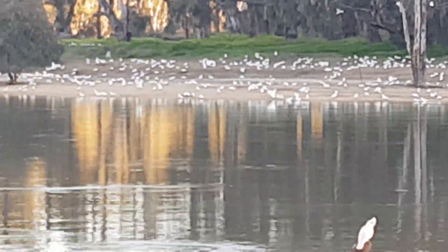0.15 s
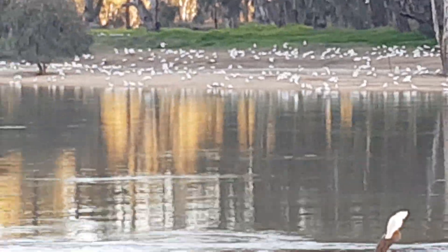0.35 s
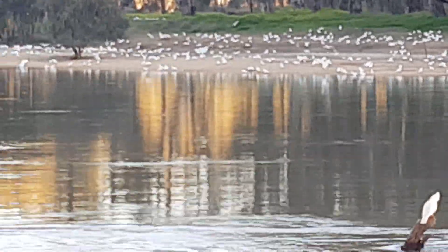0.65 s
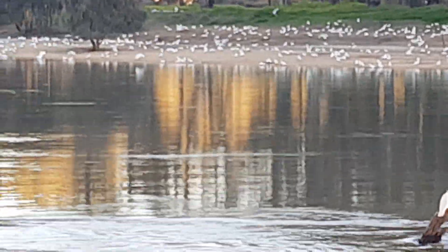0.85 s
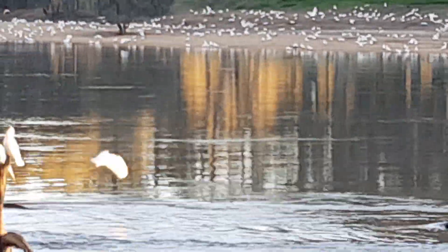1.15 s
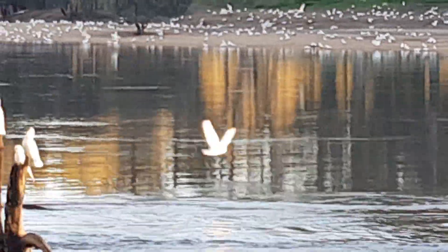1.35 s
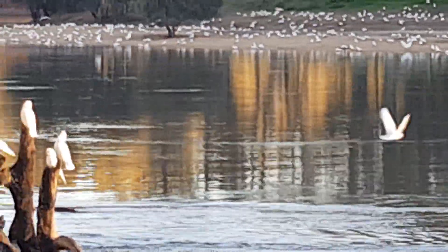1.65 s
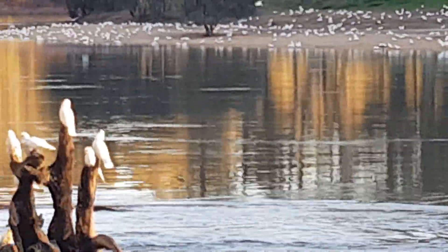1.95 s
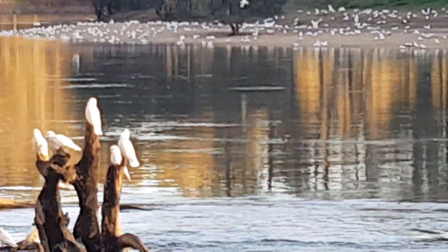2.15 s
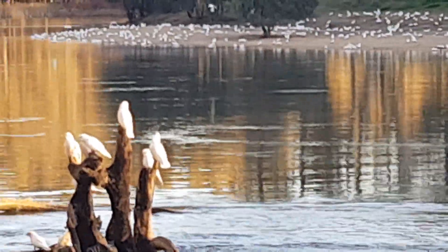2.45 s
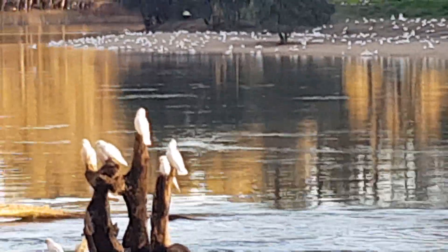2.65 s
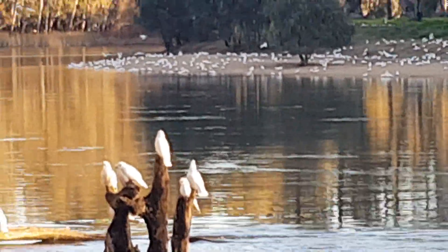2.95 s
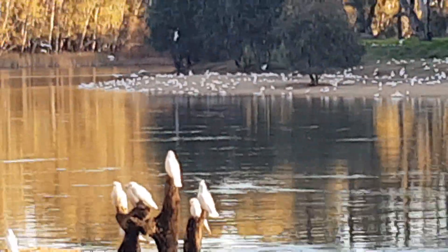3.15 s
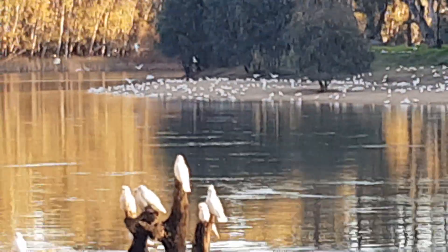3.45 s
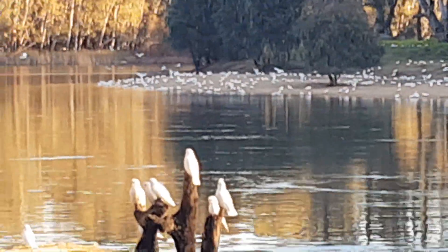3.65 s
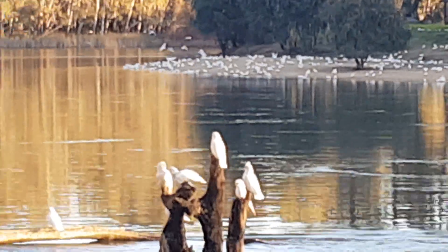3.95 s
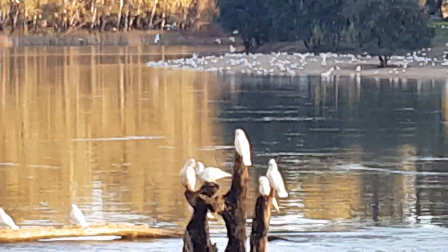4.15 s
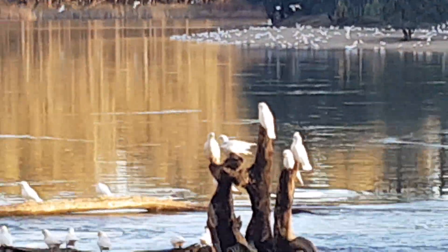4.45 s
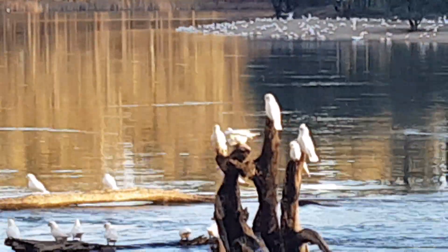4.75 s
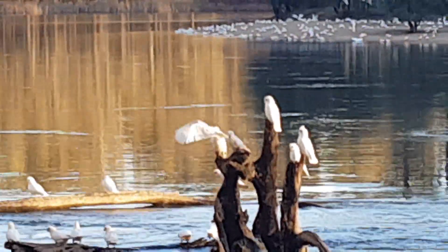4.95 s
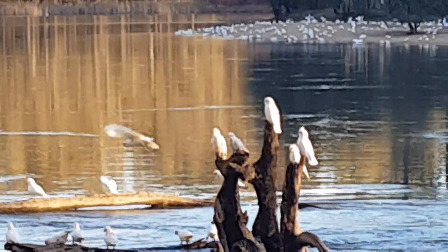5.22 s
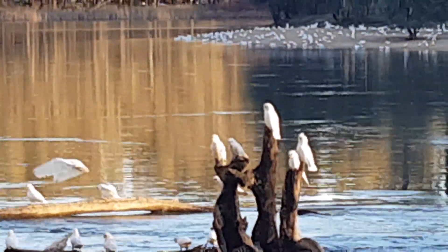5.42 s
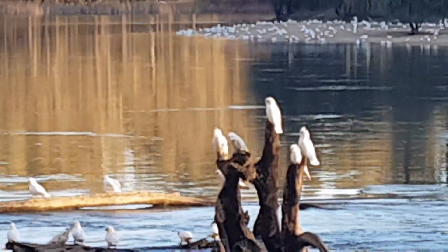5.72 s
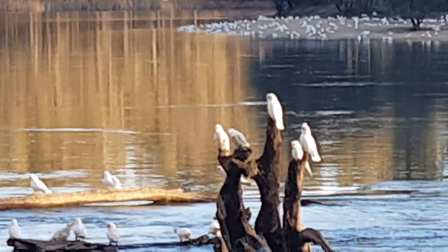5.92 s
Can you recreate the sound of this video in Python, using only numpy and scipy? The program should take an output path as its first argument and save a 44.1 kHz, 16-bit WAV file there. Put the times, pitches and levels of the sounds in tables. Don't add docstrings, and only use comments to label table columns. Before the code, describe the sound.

White parrots screech harshly and squeal close by at a riverside, over the constant clamour of a big flock across the water and a low rumble.

```python
import sys
import numpy as np
from scipy import signal
from scipy.fft import rfft, irfft, next_fast_len
from scipy.io import wavfile
from scipy.ndimage import uniform_filter1d

SR = 44100
rng = np.random.default_rng(int(sys.argv[2]) if len(sys.argv) > 2 else 0)


def dump_mix(stems):
    frames = np.atleast_2d(stems).T
    limited = np.clip(frames, -1, 1)
    pcm = np.round(limited * 32767).astype(np.int16)
    wavfile.write(sys.argv[1], SR, pcm)


def ratio(d):
    e = np.asarray(d, float) / 20
    return 10 ** e


N = 268128

TREBLE_HZ = 4500

# (start [s], length [s], effort [dB], swell [s], treble over body [dB])
SCREECHES = [(0, 0.12, -34, 0.13, -12), (.095, 0.38, -25, 0.14, -10), (.425, 0.21, -25.5, 0.0597, -10.5),
             (0.76, .42, -45.5, 0.066, -17.5), (1.171, 0.31, -35.5, 0.08, -10),
             (1.66, 0.5, -33, 0.0797, -8.5), (2.66, 0.7, -28, 0.3, -15), (3.549, 0.31, -37, 0.28, -11.5),
             (3.84, .84, -30.5, 0.09, -10), (4.875, 0.505, -27, 0.12, -13.5),
             (5.369, 0.4, -34, 0.12, -20.5), (5.816, 0.28, -40, 0.039, -12.5)]
# (pitch [Hz], low resonance [Hz], its level [dB], high resonance [Hz],
# its level [dB], beak resonance [Hz], its level [dB])
SCREECHERS = [(1136, 2300, 3, 3100, 3, 10200, 5), (1255, 2620, 14, 3500, 9, 11370, 6.5),
              (1229, 2610, 12, 3480, 12, 10900, 6), (1090, 2130, 12, 3200, 0, 9900, -8),
              (1145, 2300, 5, 3320, 10, 10100, 7), (1104, 2400, 5, 3320, 10, 9970, 2.5),
              (1135, 2340, 8, 3210, 8, 9500, 3), (1204, 2750, 5, 3240, 7, 10100, 4),
              (1179, 2630, 6, 3340, 7, 9840, 5), (1199.5, 2480, 9, 3300, 10, 10500, 5),
              (1124, 2490, 10, 3220, 9, 10000, 4), (1140, 2560, 9, 3240, 8, 9600, 5)]
SCREECH_LEADS = [.2, .18, .18, -.18, .24, .26, .215, .34, .23, .35, .23, .23]
SCREECH_RELEASES = [.04, .06, .05, .04, .04, .04, .16, .04, .05, .04, .04, .04]
NASAL_LEVELS = [0, 6.5, 6.5, -4, 2, 2.5, -1, 0, 3, 2, 0, 0]
WINDPIPE_WIDTHS = [900, 600, 600, 900, 700, 750, 1050, 900, 900, 1000, 800, 900]
# (start [s], length [s], effort [dB], swell [s])
SQUEALS = [(.615, .06, -38, .02), (.722, .04, -40.5, .013), (1.27, .14, -43, .03),
           (1.585, .105, -33.5, .015), (1.68, .045, -32, .012), (1.755, .13, -32, .09),
           (2.212, .068, -35, .012), (2.258, .08, -31.5, .008), (2.338, .078, -31.5, .012),
           (2.49, .125, -39, .09), (2.655, .05, -38, .02), (3.35, .045, -45, .02), (3.7, .11, -43, .05),
           (3.785, .11, -41, .055), (4.04, .52, -29.5, .17), (4.645, .082, -27.5, .04),
           (4.728, .05, -30, .01), (4.762, .065, -27.5, .015), (4.672, .055, -31, .03),
           (4.74, .05, -33, .015), (4.845, .07, -31.5, .012), (5.33, .295, -33.5, .03),
           (5.65, .09, -33, .05), (5.73, .095, -29, .02), (5.81, .055, -31, .01), (5.88, .04, -36, .01),
           (6.03, .065, -30.5, .015), (4.625, .035, -33, .012), (4.812, .042, -33, .008)]
SQUEAL_LEADS = [-.35, -.39, .24, .25, .27, -.36, -.42, -.275, -.28, -.41, -.43, -.34, -.5, .23, .27, -.28,
                -.28, -.27, .36, .37, -.32, .23, -.42, -.39, -.375, -.3, -.32, .36, -.27]
# (first pitch [Hz], pitch at the bend [Hz], last pitch [Hz], place of the bend
ARCHES = [(1230, 1300, 1490, .35), (915, 935, 925, .5), (753, 776, 794, .45), (950, 1060, 1005, .4),
          (1010, 1005, 990, .5), (1082, 1095, 1050, .7), (820, 842, 788, .3), (785, 812, 700, .6),
          (812, 790, 620, .6), (670, 800, 890, .55), (870, 900, 880, .4), (830, 930, 800, .45),
          (776, 775, 750, .4), (970, 1092, 1050, .65), (624, 664, 615, .27), (800, 812, 840, .6),
          (812, 788, 822, .4), (815, 832, 820, .45), (900, 1110, 980, .7), (940, 1025, 850, .4),
          (915, 1130, 1165, .75), (590, 690, 578, .25), (705, 790, 838, .55), (830, 935, 750, .36),
          (755, 697, 702, .4), (740, 735, 725, .5), (665, 684, 570, .22), (980, 1085, 950, .5),
          (825, 795, 715, .4)]
# (first [Hz], level [dB], second [Hz], level [dB])
WINDPIPES = [(2780, 28, 5560, 8), (2800, 24, 1870, 3), (775, 12, 3100, 8), (2030, 24, 3900, 24),
             (2010, 16, 4020, 27), (2160, 19, 3280, 16), (2400, 26, 3300, 6), (2350, 29, 3350, 11),
             (2350, 30, 3350, 10), (2500, 22, 2050, 8), (2680, 22, 3500, 6), (3440, 16, 2200, 14),
             (770, 14, 4600, 14), (3250, 12, 2150, 5), (1290, 13, 2900, 24), (3280, 18, 2450, 25),
             (3200, 21, 2430, 21), (3280, 17, 2460, 25), (2100, 22, 3300, 4), (1950, 22, 3700, 14),
             (3150, 22, 2200, 10), (1290, 15, 2900, 17), (2450, 20, 3200, 8), (2600, 28, 2300, 8),
             (2840, 22, 3500, 12), (2200, 20, 3600, 8), (3200, 24, 2550, 12), (2100, 22, 3300, 6),
             (1550, 20, 4000, 12)]
BEAK_CENTRES = [5050, 5050, 5050, 5500, 6000, 5050, 5050, 5100, 5000, 5050, 5050, 5050, 5050, 5050, 5050,
                5000, 5600, 5200, 5400, 5050, 4800, 5050, 4600, 5500, 5050, 5050, 5050, 5400, 5000]
BEAK_LEVELS = [8, 4, 4, 13, 14, 0, 16, 29, 29, 20, 16, 4, 8, 4, 4, 18, 26, 28, 26, 6, 26, 5, 28, 33, 24, 4,
               12, 16, 14]
SQUEAL_TREBLES = [-11, -5, 4, -6, -6, -23, -10, -8, -12, -24, -11, -12, -5, 14, -8, 1, 1, 2, 0, 5, 0, -1, 7,
                  10, 0, -6, -4, -6, -6]
SQUEAL_ROUGHNESS = [.1, .12, .5, .12, .1, .2, .2, .2, .2, .15, .2, .2, .4, .08, .45, .3, .25, .35, .15, .2,
                    .15, .6, .15, .08, .15, .3, .15, .2, .2]


def near_birds():
    harsh, clear = np.zeros((2, 2, N))
    screeches = zip(SCREECHES, SCREECH_LEADS, SCREECH_RELEASES, NASAL_LEVELS, WINDPIPE_WIDTHS, SCREECHERS)
    for row, lead_ms, release_s, nasal_db, width_hz, bird in screeches:
        voice = screech(row, release_s, nasal_db, width_hz, *bird)
        add(harsh, row[0], near_call(voice, lead_ms), lead_ms)
    squeals = zip(SQUEALS, SQUEAL_LEADS, ARCHES, WINDPIPES, BEAK_CENTRES, BEAK_LEVELS,
                  SQUEAL_TREBLES, SQUEAL_ROUGHNESS)
    for row, lead_ms, *voice in squeals:
        add(clear, row[0], near_call(squeal(row, *voice), lead_ms), lead_ms)
    return harsh, clear


# (frequency [Hz], level per Hz [dB])
THROAT = [(300, -57), (550, -19), (700, -6.5), (1200, -7), (1800, -2.5), (2500, -5), (3650, -4),
          (4200, -10), (6000, -14), (7500, -25), (8700, -19), (11100, -26), (15500, -32.5)]


def screech(row, release_s, nasal_db, width_hz, pitch_hz, first_ring_hz, first_ring_db, second_ring_hz, second_ring_db, beak_hz, beak_db):
    _, length, top_db, swell_s, treble_db = row
    course_db = effort(length, swell_s, 8.5, 6.5, release_s)
    n = len(course_db)

    def moving():
        return 1 + .005 * (course_db + 2) + .02 * wander(n, .03)

    stumble = .05 * wander(n, .002)
    pulses = syrinx(pitch_hz * (moving() + stumble), .85)
    plain = shaped(pulses, lambda f: ratio(read(THROAT, f)))
    rings = [(first_ring_hz, first_ring_db, width_hz), (second_ring_hz, second_ring_db, width_hz),
             (beak_hz, beak_db, 1800), (0.78 * beak_hz, nasal_db, 900)]
    voice = plain + sum((ratio(db) - 1) * resonate(plain, hz * moving(), width) for hz, db, width in rings)
    treble = shaped(voice, lambda f: f > TREBLE_HZ)
    body = evened(voice - treble)
    strain_db = 0.12 * course_db
    waver_db = 0.67 * wander(n, 0.039) + 1.2 * wander(n, 0.002)
    return ratio(top_db + course_db + waver_db) * (body + ratio(treble_db + strain_db) * evened(treble))


def squeal(row, arch, windpipe, beak_hz, beak_db, treble_db, rough):
    _, length, top_db, swell_s = row
    first_hz, top_hz, last_hz, place = arch
    first_ring_hz, first_ring_db, second_ring_hz, second_ring_db = windpipe
    course_db = effort(length, swell_s, 12, 21, .012)
    n = len(course_db)
    arch_hz = np.interp(np.linspace(0, 1, n), [0, place, 1], [first_hz, top_hz, last_hz])
    hz = arch_hz * (1 + .006 * wander(n, .008))
    turns = np.cumsum(hz * (1 + 0.0283 * rough * wander(n, 0.002))) / SR
    order = np.arange(1, 19)[:, None]

    def bump(centre_hz, width_hz=430):
        return 1 / (1 + ((order * hz - centre_hz) / width_hz) ** 2)

    rings_db = first_ring_db * bump(first_ring_hz) + second_ring_db * bump(second_ring_hz) + beak_db * bump(beak_hz, 1100)
    over_throat_db = np.where(order < 9, -16 + rings_db, treble_db)
    levels = ratio(read(THROAT, order * hz) + over_throat_db)
    tone = np.zeros(n)
    for k, level in enumerate(levels, 1):
        flutter = ratio(1.46 * wander(n, 0.011) + 6 * rough * wander(n, 0.0017))
        tone += level * flutter * np.cos(2 * np.pi * k * turns)
    tone = np.sqrt(2) * tone / np.linalg.norm(levels, axis=0)
    rasp = evened(shaped(syrinx(hz, 0.94), lambda f: ratio(read(THROAT, f))))
    return ratio(top_db + course_db) * (tone + ratio(-11) * rasp)


def syrinx(hz, rough, jitter=.12, shimmer_db=3.5, breath=0.64, count=13):
    n = len(hz)
    stumble = jitter * rough * wander(n, .0006) + .02 * wander(n, 0.01504)
    turns = np.cumsum(hz * (1 + stumble)) / SR
    order = np.arange(1, count + 1)[:, None]
    partials = np.cos(2 * np.pi * order * turns) * (order * hz < 15800)
    pulses = partials.sum(0)
    puffs = (0.99 + np.exp(-(turns % 1) / 0.44)) * rng.standard_normal(n)
    strength = ratio(shimmer_db * rough * wander(n, 0.00064))
    share = np.clip(breath * rough, 0, 1)
    return (np.sqrt(1 - share ** 2) * evened(pulses) + share * evened(puffs)) * strength


def effort(length, swell_s, swell_db, sag_db_per_s, release_s, release_db=21):
    t = np.arange(0, length, 1 / SR)
    swell = -swell_db * np.clip(1 - t / swell_s, 0, 1)
    sag = -sag_db_per_s * np.maximum(t - swell_s, 0)
    release = -release_db * np.clip(1 - (length - t) / release_s, 0, 1)
    return swell + sag + release


def resonate(x, hz, width_hz):
    turn = np.exp(2j * np.pi * np.cumsum(hz) / SR)
    r = np.exp(-np.pi * width_hz / SR)
    return 2 * (turn * signal.lfilter([(1 - r) ** 2], [1, -2 * r, r * r], x / turn)).real


def near_call(voice, lead_ms, shadow_db=8.0):
    voice = voice * signal.windows.tukey(len(voice), min(0.0054 * SR / len(voice), 1))
    lost = 1 - ratio(-shadow_db * (lead_ms < 0))
    dull = voice - lost * shaped(voice, lambda f: f > TREBLE_HZ)
    return np.array([dull, voice])


def scatter(x, t60, count):
    at = np.arange(count) * 20 + 60 + rng.integers(0, 20, (2, count))
    taps = np.zeros((2, count * 20 + 100))
    echoes = rng.choice([-1., 1.], at.shape) * ratio(-60 * at / SR / t60)
    np.put_along_axis(taps, at, echoes, 1)
    return signal.fftconvolve(x, taps / np.linalg.norm(taps[0]), axes=1)[:, :N]


def shifting(x, t60, count):
    turn = 2 * np.pi * 3.5 * np.arange(N) / SR
    return sum(scatter(x * np.sqrt(2 / 3) * np.cos(turn + k * np.pi / 3), t60, count) for k in range(3))


# (time [s], level [dB])
CLAMOUR = [(0.0, -43.5), (0.25, -49), (0.66, -50), (1.2, -49), (1.42, -48), (2.32, -50), (2.5, -52),
           (2.8, -43.5), (3.23, -45), (3.45, -51.5), (3.6, -48), (4.69, -43.5), (5.6, -46.5), (5.72, -43),
           (6.08, -43)]
# (frequency [Hz], level per Hz [dB])
FAR_COLOUR = [(260, -40), (450, -16), (605, -7.5), (1090, -13.5), (1330, -8), (1450, -5.5), (1680, -12),
              (2070, -6), (2330, -4), (2820, -8), (3000, -10), (3630, -12.5), (4530, -19), (8080, -39.5),
              (15500, -37)]


def far_bank(count=110):
    mix = np.zeros((2, N + SR))
    lead_in_s = .4
    for k, (at, long, pitch, arch, rough, loud, side) in enumerate(rng.random((count, 7))):
        u = np.linspace(0, 1, round((.15 + .4 * long) * SR))
        hz = (600 + 600 * pitch) * (1 + .15 * arch * np.sin(np.pi * u))
        call = ratio(7.0 * loud) * syrinx(hz, 0.2985 + 0.592 * rough, count=8)
        call = call * signal.windows.tukey(len(u), .3)
        start_s = (k + at) / count * (N / SR + lead_in_s)
        add(mix, start_s, np.array([call, call]), .7 * side - .5)
    mix = mix[:, round(lead_in_s * SR):][:, :N]
    mix = mix + shifting(mix, 0.88, count=1200)
    mix = evened(shaped(mix, lambda f: ratio(read(FAR_COLOUR, f))))
    s, level_db = np.transpose(CLAMOUR)
    return ratio(np.interp(np.arange(N) / SR, s, level_db) + 10.0) * mix


# (time [s], peak level [dB])
PLOP = [
    (6.01, -34),
]


def plop():
    mix, t = np.zeros((2, N)), np.arange(900) / SR
    for s, peak_db in PLOP:
        ring = ratio(peak_db - 60 * t / 0.03) * np.sin(2 * np.pi * 340 * t)
        add(mix, s - .004, np.array([ring, ring]), 0)
    return mix


# (time [s], pitch [Hz], level [dB])
HUM = [(0, 187, -51), (.25, 186, -44.5), (.65, 185, -51), (.85, 184.5, -45), (1.3, 183.5, -48),
       (1.7, 182.5, -53), (2.2, 181, -58), (3, 178, -56), (3.7, 177, -63), (4.3, 176, -60), (5, 175, -68),
       (6.08, 174, -70)]
# (time [s], pitch [Hz], level [dB])
THROB = [(0.0, 68, -50), (0.3, 70.1, -66.5), (0.76, 70, -51), (1.64, 68.2, -65), (1.69, 69.9, -56),
         (2.13, 68.6, -62.5), (2.81, 65, -64), (3.3, 67.8, -59), (3.49, 64.7, -58), (3.84, 65.4, -53),
         (4.21, 63.6, -65), (4.37, 68.2, -50.5), (5.88, 67.6, -53), (6.08, 65.3, -54)]


def motors():
    upper = np.array(HUM) * [1, 1.22, 1]
    return motor_order(HUM, .8, .03) + ratio(-13) * motor_order(upper, 2.5, .05) + motor_order(THROB, 3., .04)


def motor_order(rows, flutter_db, span_s):
    s, hz, level_db = np.transpose(rows)
    t = np.arange(N) / SR
    turns = np.cumsum(np.interp(t, s, hz) + 1.38 * wander(N, span_s)) / SR
    level = ratio(np.interp(t, s, level_db) + flutter_db * wander(N, span_s))
    return np.sqrt(2) * level * np.sin(2 * np.pi * turns)


# (frequency [Hz], level per Hz [dB])
RUMBLE_COLOUR = [(25, -49), (42, 2), (76, -5), (124, -8), (195, -11.5), (372, -19.5), (459, -23.5),
                 (600, -10.5), (780, -9.5), (1320, -120)]
# (frequency [Hz], left-right likeness [-1 to 1])
RUMBLE_LIKENESS = [(60, 0.97), (130, 0.92), (290, 0.75), (640, 0.79), (1410, -0.38), (3100, -0.24),
                   (6820, 0.05), (15000, -0.0)]


def rumble():
    a, b = rng.standard_normal((2, N))

    def same(f):
        return np.clip(read(RUMBLE_LIKENESS, f), 0, 1)

    right = shaped(a, same) + shaped(b, lambda f: np.sqrt(1 - same(f) ** 2))
    wash = evened(shaped(np.array([a, right]), lambda f: ratio(read(RUMBLE_COLOUR, f))))
    return ratio(-51) * wash * ratio(1.3 * wander(N, 0.1))


# (frequency [Hz], level per Hz [dB])
HISS_COLOUR = [(3000, -30), (6500, -5), (10000, 0), (13000, -6), (15500, -14)]


def hiss():
    noise = rng.standard_normal((2, N))
    return ratio(-67.5) * evened(shaped(noise, lambda f: ratio(read(HISS_COLOUR, f)) * (f > 1500)))


def evened(x):
    return x / np.sqrt(np.mean(x ** 2) + 1e-20)


def read(points, hz):
    f, value = np.transpose(points)
    return np.interp(np.log(hz + 1), np.log(f + 1), value)


def shaped(x, gain):
    size = next_fast_len(x.shape[-1] + 2048)
    return irfft(rfft(x, size) * gain(np.fft.rfftfreq(size, 1 / SR)), size)[..., :x.shape[-1]]


def wander(length, span_s):
    size = max(round(span_s * SR), 1)
    return evened(uniform_filter1d(uniform_filter1d(rng.standard_normal(length), size), size))


def add(mix, s, sound, lead_ms):
    late = round(abs(lead_ms) * SR / 1000)
    for port in range(2):
        delay = late if (lead_ms > 0) == port else 0
        part = mix[port, round(s * SR) + delay:][:sound.shape[1]]
        part += sound[port, :len(part)]


def scene():
    harsh, clear = near_birds()
    echoed = harsh + ratio(-9) * clear
    far_trees = ratio(-13) * scatter(echoed, .5, count=1000)
    near_echoes = ratio(-1.5) * shifting(echoed, 0.11, count=120)
    near = ratio(-3.0) * (harsh + clear) + near_echoes + far_trees
    return near + far_bank() + rumble() + motors() + plop() + hiss()


def band_limit(x):
    return signal.sosfilt(signal.butter(12, 15760, fs=SR, output="sos"), x)


# (frequency [Hz], left over right [dB])
PORTS_COLOUR = [(60, 0.5), (300, 2), (650, 1.5), (1000, 2), (1900, 2.5), (2500, 3), (3100, 6), (3700, 5.5),
                (4300, -2), (5600, -2), (6500, -9.5), (7500, -2), (9500, -3), (15000, -4.5)]
# (frequency [Hz], left ahead [rad])
PORTS_PHASE = [(500, -0.44), (1200, -0.17), (3000, 0.22), (4200, -1.73), (15000, -0.76)]


def record(dry):
    def half(f):
        return ratio(read(PORTS_COLOUR, f) / 2) * np.exp(.5j * read(PORTS_PHASE, f) * (f > 400))

    ports = np.array([shaped(dry[0], half), shaped(dry[1], lambda f: 1 / half(f))])
    return band_limit(ports)


dry = scene()
out = record(dry)
dump_mix(out)
```